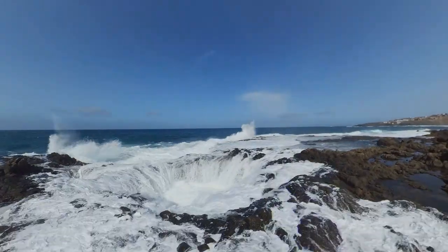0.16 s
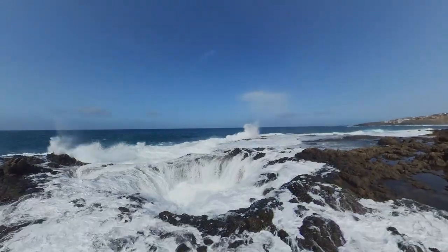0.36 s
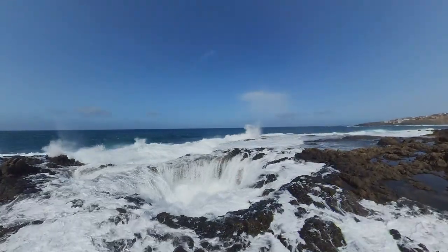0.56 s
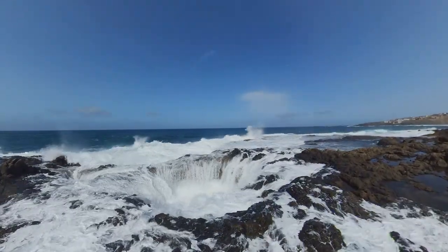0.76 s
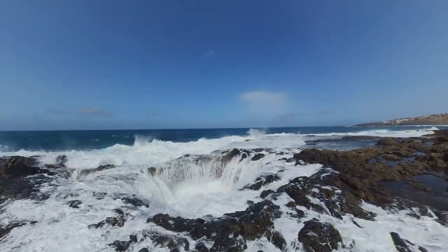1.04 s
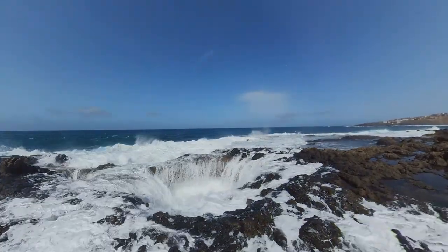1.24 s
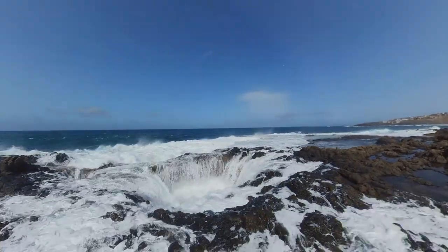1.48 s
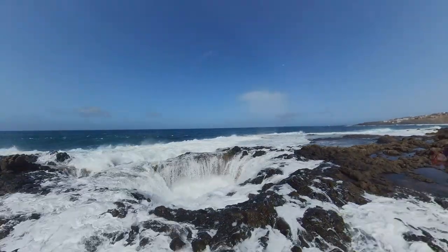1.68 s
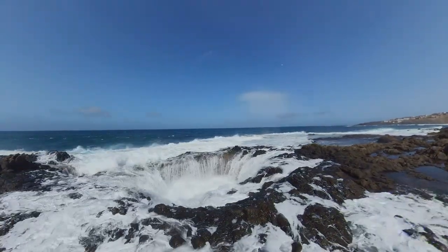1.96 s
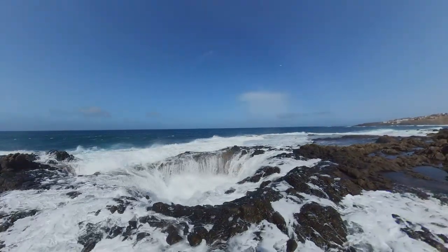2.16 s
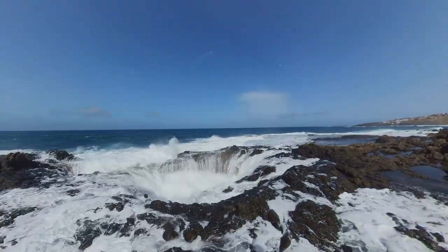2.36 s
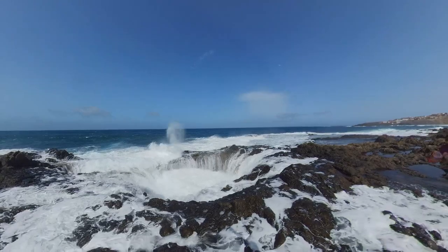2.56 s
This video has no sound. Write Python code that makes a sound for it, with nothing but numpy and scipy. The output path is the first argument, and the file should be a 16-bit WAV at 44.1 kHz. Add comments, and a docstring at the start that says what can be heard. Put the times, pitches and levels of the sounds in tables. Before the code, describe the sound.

Sea surf roars and fizzes continuously over coastal rocks, swelling early, easing, then swelling again near the end. Throughout, gusts of wind hit the microphone with a deep rumble and lumpy buffeting.

```python
"""Surf on rocks in gusty wind

Breaking water roars and fizzes over coastal rocks; the microphone port hollows out its
upper middle and lifts a band of hiss above that. Louder gusts hit the small microphone
with a deep rumble and lumpy buffeting. Gain control and a limiter hold down the loud lumps."""
import sys
import numpy as np
from scipy import signal
from scipy.io import wavfile
from scipy.ndimage import uniform_filter1d, minimum_filter1d

SR = 44100
rng = np.random.default_rng(int(sys.argv[2]) if len(sys.argv) > 2 else 0)


def materialize(psi):
    """Save the field psi as 16-bit PCM at rate SR to the path in sys.argv[1].

    A 1-D psi becomes a single channel; in a 2-D psi each row is a channel.
    """
    bounded = np.clip(np.atleast_2d(psi).T, -1, 1)
    quanta = np.round(bounded * 32767).astype(np.int16)
    wavfile.write(sys.argv[1], SR, quanta)


N = 119952


def gain_of(db):
    return 10 ** (np.asarray(db) / 20)


def unit_rms(x):
    return x / np.sqrt(np.mean(x ** 2) + 1e-20)


def curves(table):
    """Each column after start_s, interpolated per sample."""
    start_s, *columns = np.transpose(table)
    return [np.interp(np.arange(N) / SR, start_s, column) for column in columns]


def smooth(x, span_s):
    size = round(span_s * SR)
    return uniform_filter1d(uniform_filter1d(x, size), size)


def wander(span_s):
    """Unit-RMS random drift that changes over about span_s."""
    return unit_rms(smooth(rng.standard_normal(N), span_s))


def coloured_noise(spectrum, patch_db, fft_size=1024, band_hz=(0, 20000)):
    """Noise with drifting spectral patches, scaled to unit RMS within band_hz."""
    hop = fft_size // 4
    bin_hz = np.fft.rfftfreq(fft_size, 1 / SR)
    real, imag, patches = rng.standard_normal((N // hop + 5, len(bin_hz), 3)).T
    patches = unit_rms(uniform_filter1d(uniform_filter1d(patches, 10, axis=0), 10, axis=1))
    freq_hz, density_db = np.transpose(spectrum)
    shape_db = np.interp(np.log(bin_hz + 1), np.log(freq_hz), density_db, left=-120, right=-120)
    frames = (real + 1j * imag) * gain_of(shape_db[:, None] + patch_db * patches)
    in_band = ((bin_hz >= band_hz[0]) & (bin_hz <= band_hz[1]))[:, None]
    _, waves = signal.istft(np.array([frames, frames * in_band]), nperseg=fft_size, noverlap=fft_size - hop)
    whole, band = waves[:, :N]
    return whole / np.sqrt(np.mean(band ** 2))


def steadied(x, share=0.8, span_s=0.032):
    """Removes a share of a noise's random swell so it follows its level curve."""
    power = abs(smooth(x ** 2, span_s)) + 1e-12
    return x * (np.mean(x ** 2) / power) ** (share / 2)


# Sea spectra through the microphone port: freq_hz, density_db
ROAR_SPECTRUM = [(20, -4), (80, 22.5), (160, 24.5), (300, 23.5), (450, 22.5), (650, 19.5), (1000, 13),
                 (1600, 7), (2200, 0.5), (3100, -8.5), (4000, -21), (4800, -39)]
HISS_SPECTRUM = [(700, -6.5), (1200, -2.5), (2200, 4), (3100, -3.5), (3800, -11), (4300, -21.5),
                 (4800, -22), (5500, -15.5), (6300, -4), (7200, 0.5), (8000, -3.5), (8600, -15),
                 (9200, -25.5)]
# Sea level between and under the gusts: start_s, hiss_db, roar_over_hiss_db
SURF_LEVELS = [(0, -58, 9.5), (.03, -57, 12.5), (.14, -52.5, 10.5), (.21, -52.5, 12), (.27, -52.5, 11),
               (.36, -52.5, 9.5), (.45, -50.5, 8.5), (.52, -51, 11.5), (.6, -48.5, 8.5), (.64, -47, 8),
               (.67, -47, 7), (.685, -46.5, 10), (.695, -56, 16.5), (.78, -55.5, 12.5), (.84, -58, 13.5),
               (.95, -57, 10.5), (1.05, -60.5, 11.5), (1.14, -56, 12), (1.22, -61.5, 12), (1.3, -60, 11.5),
               (1.34, -59, 15), (1.43, -57.5, 11.5), (1.47, -58, 9), (1.56, -56.5, 12.5), (1.7, -56.5, 14),
               (1.77, -59.5, 13), (1.88, -58, 14), (1.95, -58, 13.5), (2.0, -58, 14.5), (2.05, -55.5, 15),
               (2.09, -59, 12.5), (2.25, -56.5, 12.5), (2.29, -58.5, 4), (2.365, -65, 16.5),
               (2.38, -54.5, 6), (2.44, -52, 7.5), (2.49, -49.5, 7.5), (2.54, -48.5, 7.5), (2.59, -47, 8),
               (2.6, -56.5, 16), (2.65, -59, 12), (2.72, -60, 14)]


def surf():
    """Breaking water roars and hisses; splashes and bursting foam add a faint flicker."""
    hiss_db, roar_over_hiss_db = curves(SURF_LEVELS)
    splash_db = -0.05 * wander(0.041)
    foam_db = 0.18 * wander(0.0028)
    roar = steadied(coloured_noise(ROAR_SPECTRUM, patch_db=0.54, band_hz=(1000, 4000)))
    hiss = coloured_noise(HISS_SPECTRUM, patch_db=0.54, band_hz=(5800, 8800))
    return gain_of(hiss_db + splash_db + foam_db) * (gain_of(roar_over_hiss_db) * roar + hiss)


# Wind spectra: freq_hz, density_db
RUMBLE_SPECTRUM = [(12, -35.5), (25, -14), (35, -5.5), (50, 0), (90, 2.5), (130, -9.5), (200, -27.5)]
BUFFET_SPECTRUM = [(60, -22), (110, 1.5), (140, 1), (260, -6), (500, -17.5), (1000, -28), (2000, -47.5),
                   (3500, -67.5)]
# Gusts on the microphone: start_s, rumble_db, buffet_over_rumble_db, brightness_db
WIND_GUSTS = [(0.0, -32.5, 6, 0), (0.13, -21, -6.5, -1), (0.19, -23, -10.5, -10), (0.23, -24.5, -1, -2),
              (0.27, -35.5, 12, 2), (0.32, -18, -9, -1), (0.34, -25.5, 5, -10), (0.45, -22.5, -9, 1),
              (0.48, -31, 6.5, 4.5), (0.51, -29.5, -3, 1), (0.57, -25.5, 0, 2.5), (0.64, -28.5, -2.5, -4),
              (0.7, -21, -2, 3), (0.78, -33, 9, -1.5), (0.82, -13, -10, -1), (0.86, -31, 2.5, 8.5),
              (0.91, -21, -2, -2.5), (1.0, -25, 1, -0.5), (1.04, -26, 1.5, 2), (1.1, -30, 1.5, 2.5),
              (1.14, -22.5, -0.5, -5), (1.2, -21, -0.5, -5.5), (1.25, -25, 1, -3), (1.32, -29.5, -3, 5),
              (1.42, -25.5, -3, 7), (1.46, -20.5, -2, 2), (1.5, -25.5, 3.5, -0.5), (1.56, -32, 5, -5.5),
              (1.62, -21, -8.5, 7), (1.68, -27, 2.5, -3), (1.71, -15, 0, -7.5), (1.74, -29, -3, 0.5),
              (1.84, -20, -12.5, 7), (1.89, -28.5, 6, -5.5), (1.96, -23.5, -0.5, 2), (2.04, -29, 2, 1),
              (2.11, -21, -4.5, 3.5), (2.2, -28, 3.5, -3.5), (2.28, -16.5, -6, 1.5), (2.29, -28.5, 8.5, 0),
              (2.315, -15.5, 1.5, -0.5), (2.335, -22, -5, 4), (2.36, -25.5, -7, 4), (2.38, -29.5, -5, 2),
              (2.46, -30, -6, -10), (2.56, -27, 3, -4), (2.64, -19.5, -1.5, -9), (2.67, -24.5, -1, -1.5),
              (2.72, -31, 5, -1)]


def wind(split_hz=188):
    """Air hitting the microphone: deep rumble under lumpier buffeting, both chopped by short puffs."""
    rumble_db, buffet_over_rumble_db, brightness_db = curves(WIND_GUSTS)
    rumble = gain_of(rumble_db) * steadied(coloured_noise(RUMBLE_SPECTRUM, patch_db=0.5, fft_size=4096))
    lumps_db = 1.73 * wander(0.013)
    turbulence = steadied(coloured_noise(BUFFET_SPECTRUM, patch_db=0.5, fft_size=2048))
    low = signal.sosfiltfilt(signal.butter(2, split_hz, fs=SR, output="sos"), turbulence)
    high = gain_of(brightness_db) * (turbulence - low)
    buffet = gain_of(rumble_db + buffet_over_rumble_db + lumps_db) * (low + high)
    envelope = gain_of(rumble_db) * np.hypot(1, gain_of(buffet_over_rumble_db))  # power sum
    puffs_db = 2 * wander(0.0041)
    return gain_of(puffs_db) * envelope * steadied((rumble + buffet) / envelope)


def scene():
    """Surf and wind at one microphone."""
    return (surf() + wind())[None]


def gain_control(x, threshold_db=-26, slope=0.24, span_s=0.041):
    """Turns loud lumps down by a share of their level above the threshold."""
    size = round(span_s * SR)
    power_db = 10 * np.log10(abs(uniform_filter1d(x ** 2, size)) + 1e-12)
    over_db = uniform_filter1d(np.maximum(power_db - threshold_db, 0), size)
    return x / gain_of(slope * over_db)


def limiter(x, ceiling_db=-10.8, span_s=0.006):
    """Dips the gain briefly around each peak above the ceiling."""
    size = round(span_s * SR)
    max_gain = np.minimum(gain_of(ceiling_db) / (abs(x) + 1e-9), 1)
    return x * uniform_filter1d(minimum_filter1d(max_gain, 2 * size), size)


def record(dry):
    """Camera chain: gain control, limiter, low-pass."""
    cutoff_hz = 9220
    lowpass = signal.firwin(511, cutoff_hz, window=("kaiser", 9), fs=SR)
    return signal.oaconvolve(limiter(gain_control(dry)), lowpass[None], "same")


dry = scene()
out = record(dry)
materialize(out)
```